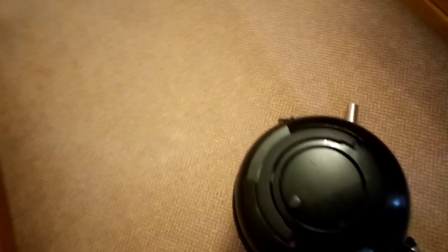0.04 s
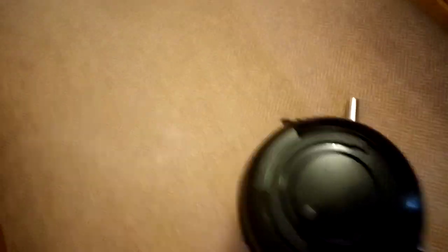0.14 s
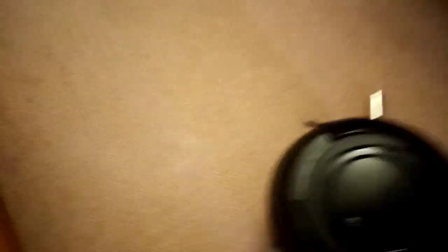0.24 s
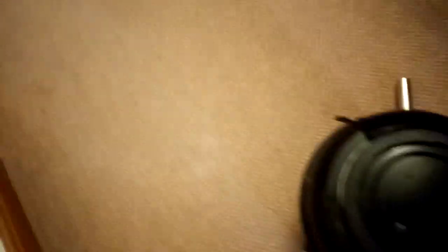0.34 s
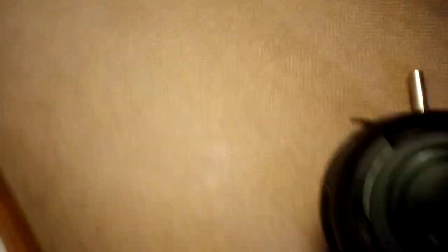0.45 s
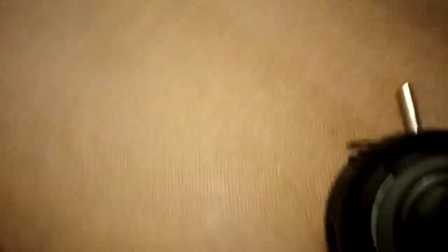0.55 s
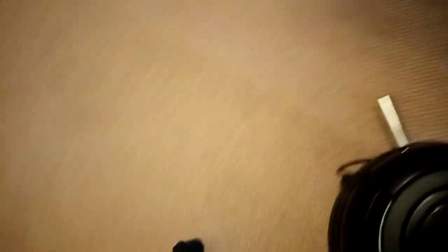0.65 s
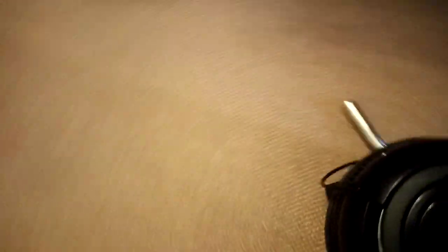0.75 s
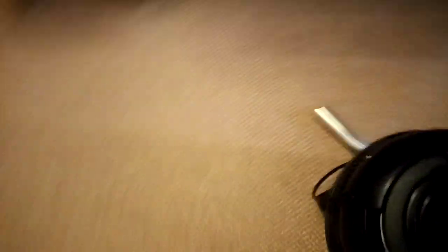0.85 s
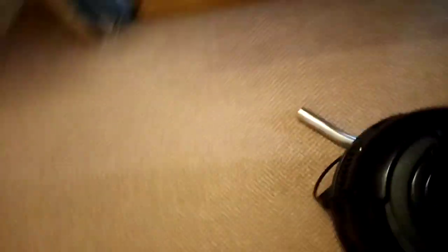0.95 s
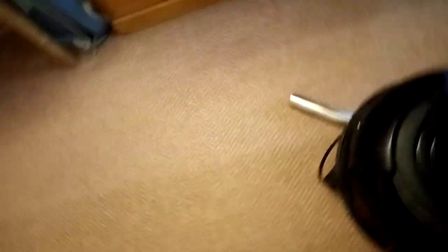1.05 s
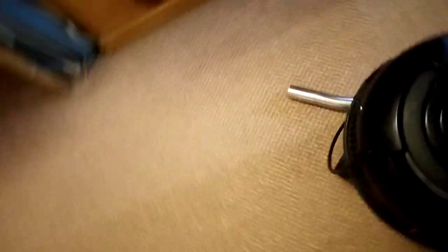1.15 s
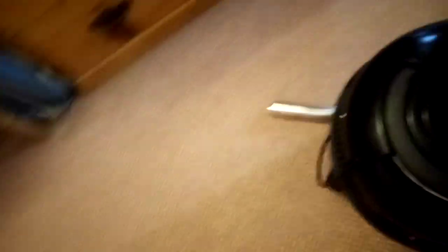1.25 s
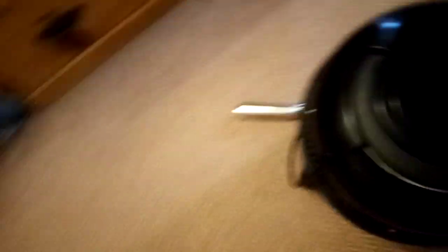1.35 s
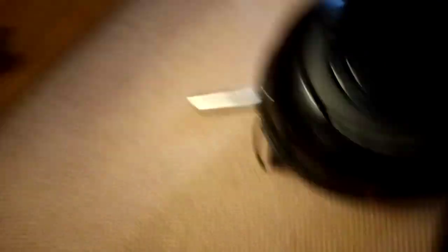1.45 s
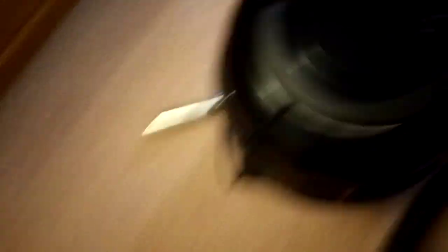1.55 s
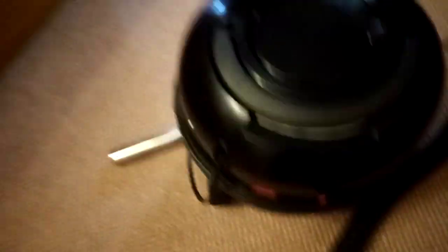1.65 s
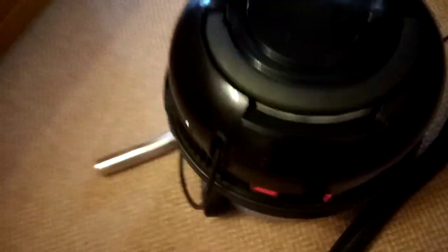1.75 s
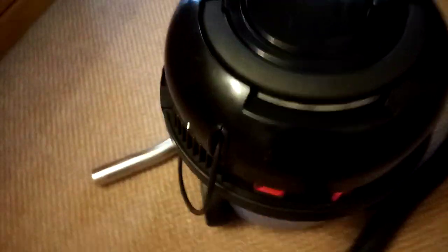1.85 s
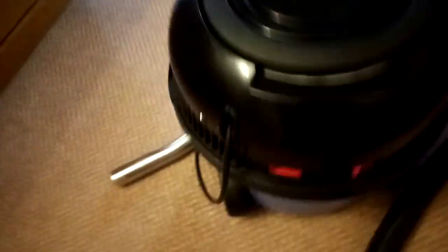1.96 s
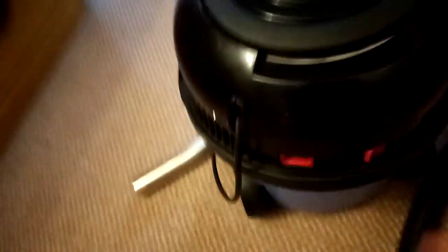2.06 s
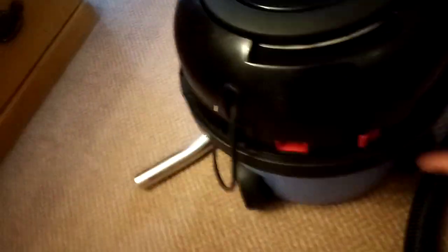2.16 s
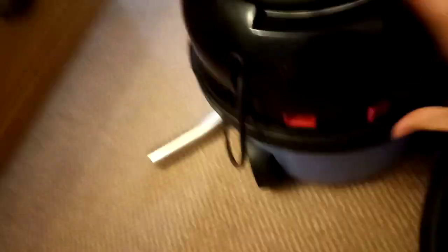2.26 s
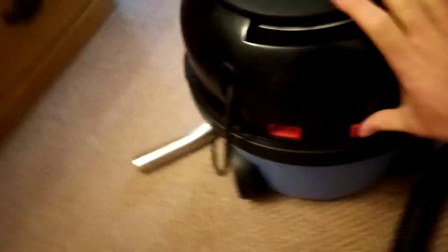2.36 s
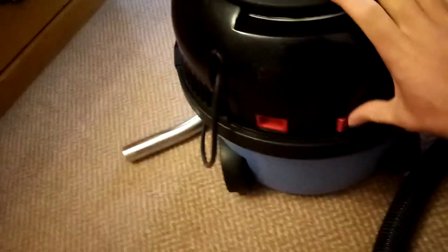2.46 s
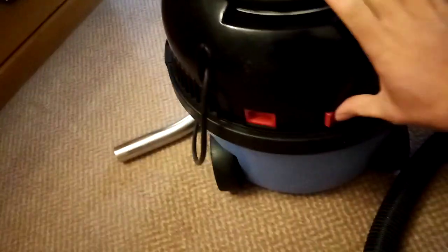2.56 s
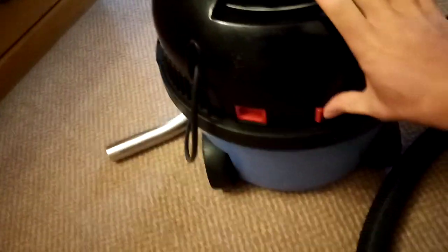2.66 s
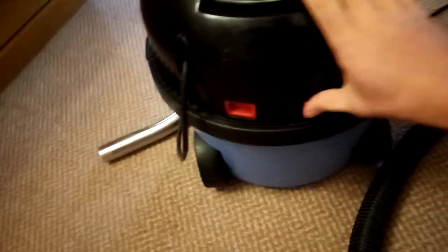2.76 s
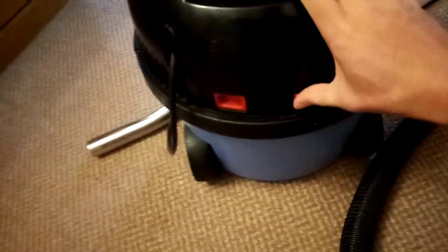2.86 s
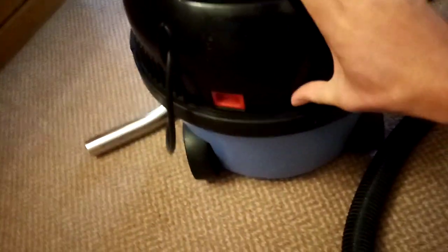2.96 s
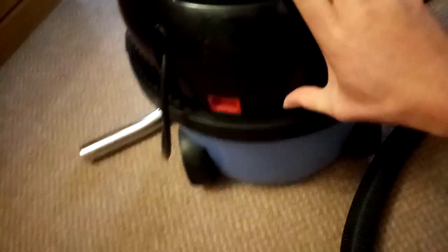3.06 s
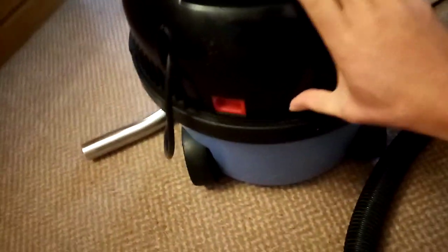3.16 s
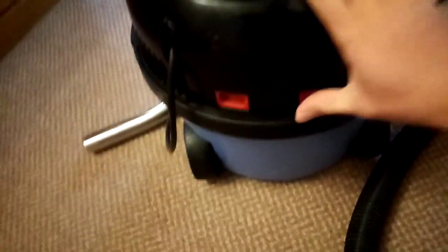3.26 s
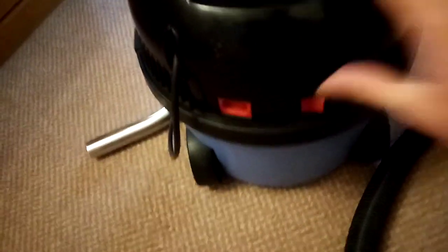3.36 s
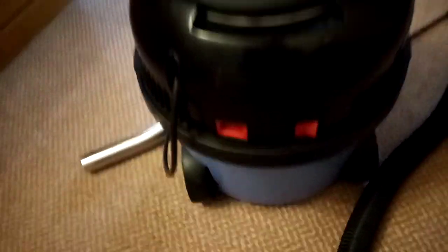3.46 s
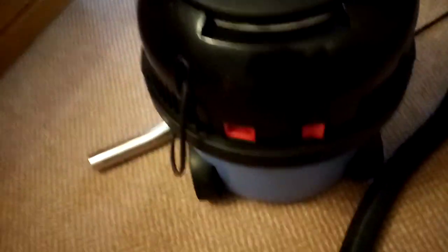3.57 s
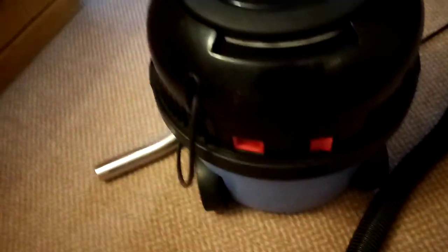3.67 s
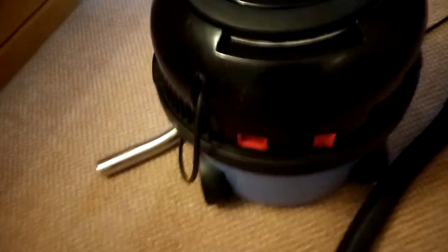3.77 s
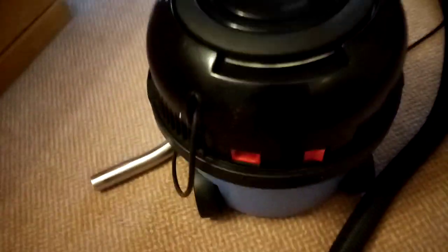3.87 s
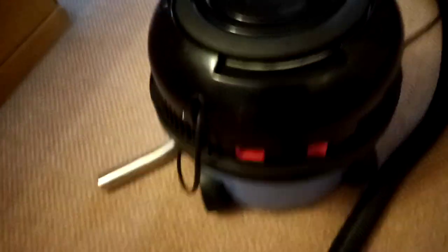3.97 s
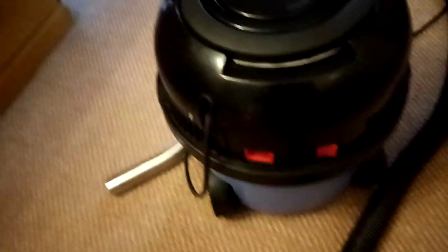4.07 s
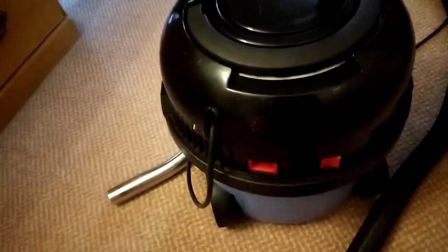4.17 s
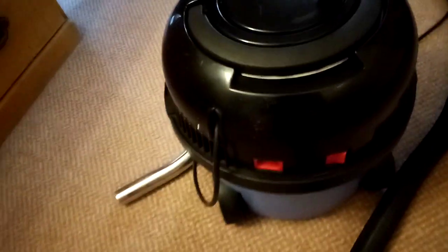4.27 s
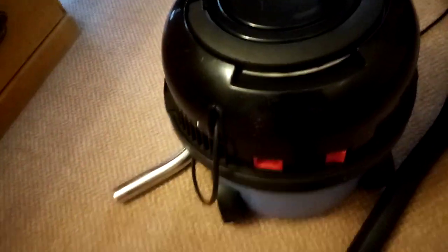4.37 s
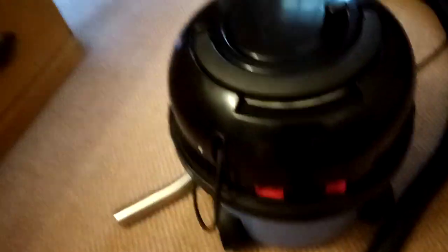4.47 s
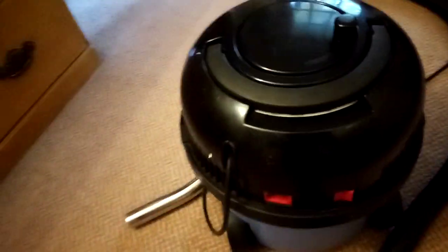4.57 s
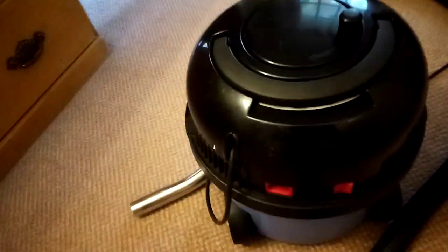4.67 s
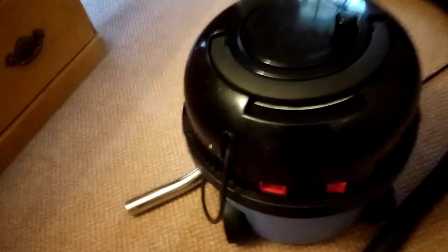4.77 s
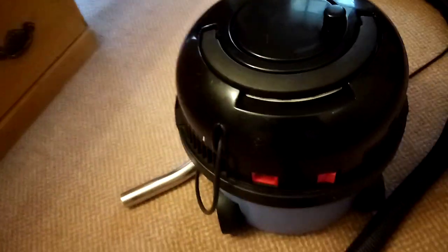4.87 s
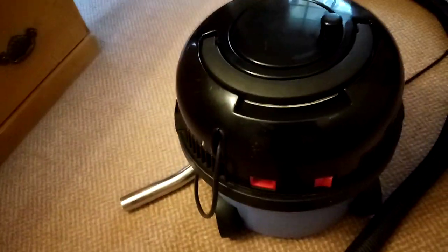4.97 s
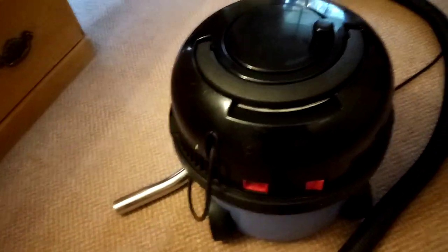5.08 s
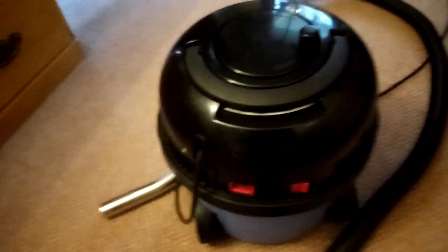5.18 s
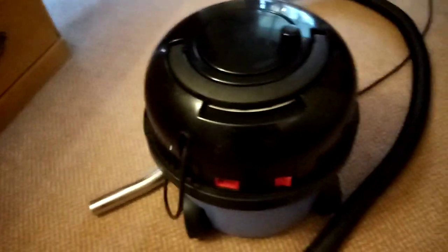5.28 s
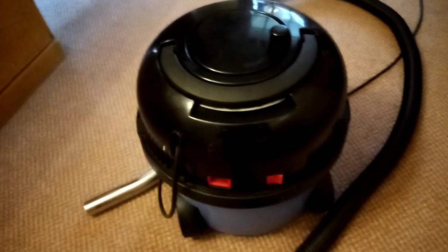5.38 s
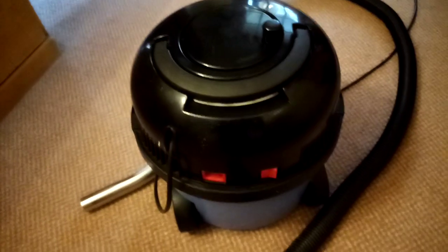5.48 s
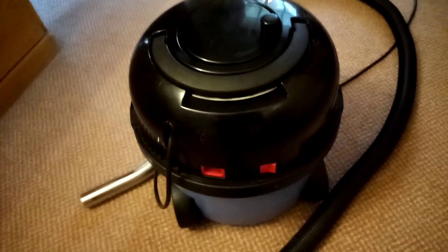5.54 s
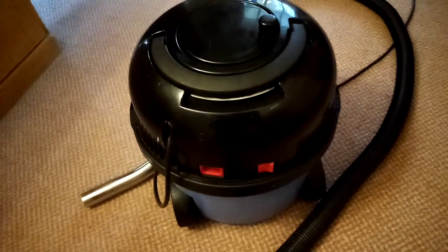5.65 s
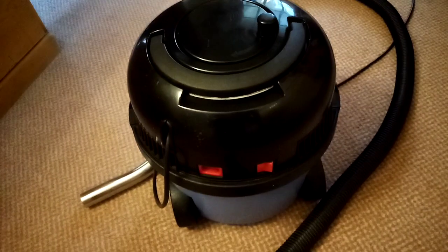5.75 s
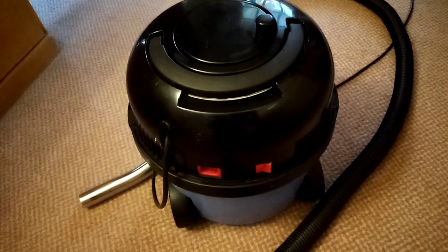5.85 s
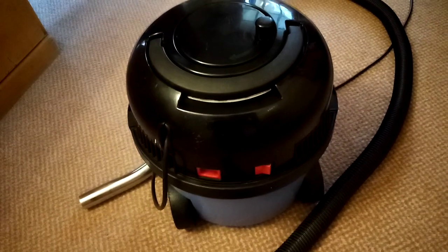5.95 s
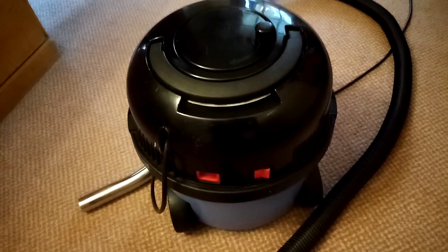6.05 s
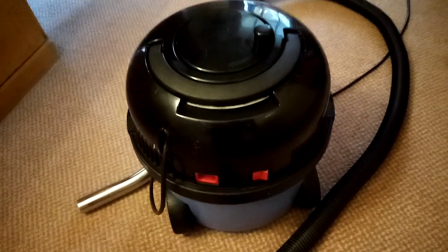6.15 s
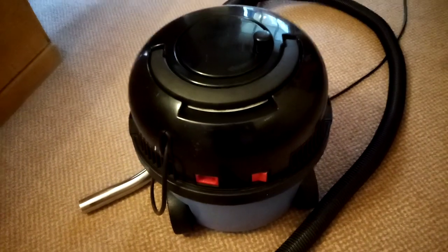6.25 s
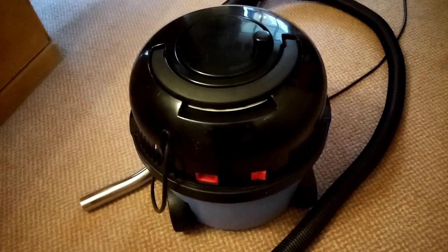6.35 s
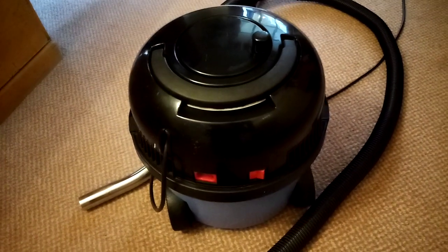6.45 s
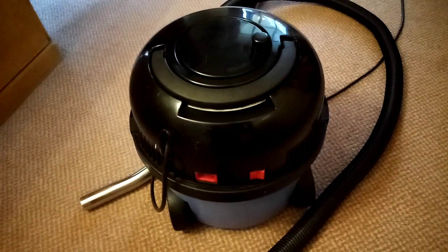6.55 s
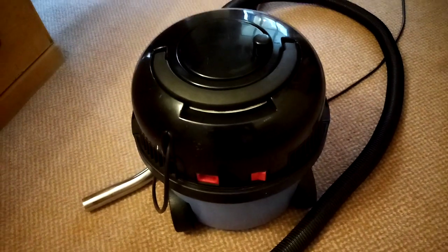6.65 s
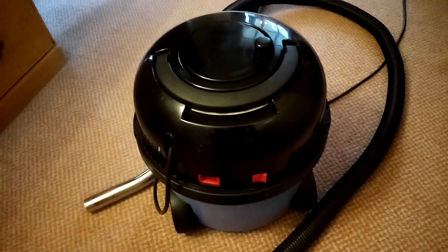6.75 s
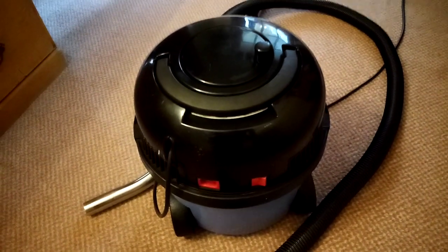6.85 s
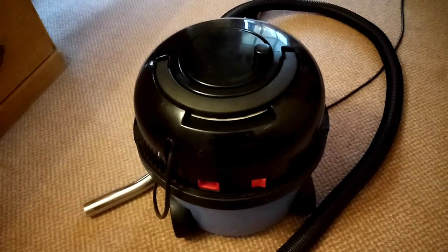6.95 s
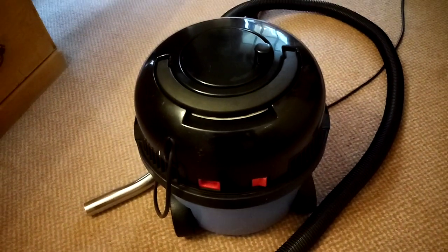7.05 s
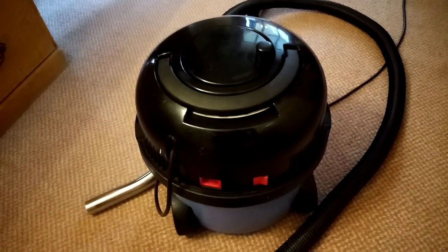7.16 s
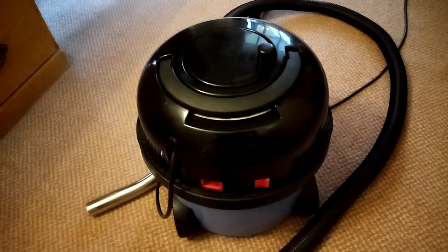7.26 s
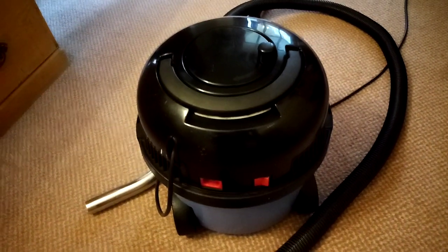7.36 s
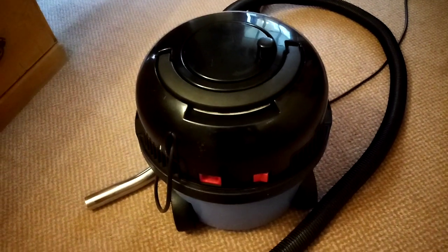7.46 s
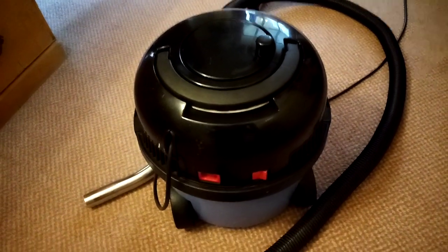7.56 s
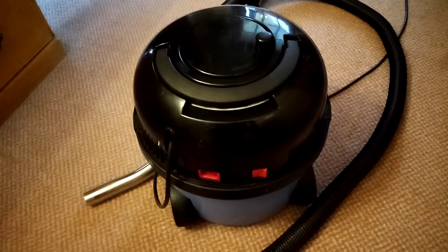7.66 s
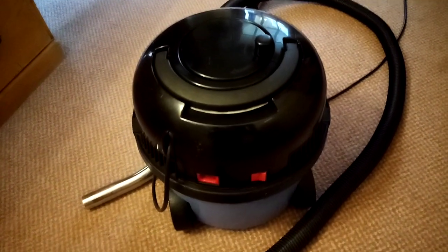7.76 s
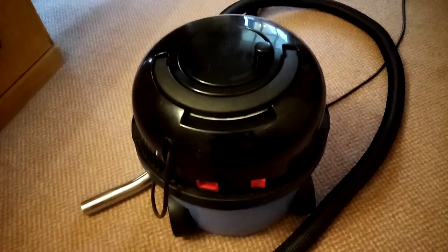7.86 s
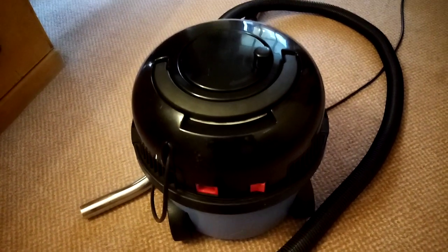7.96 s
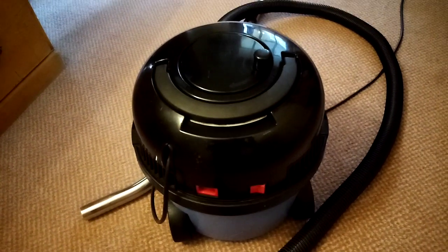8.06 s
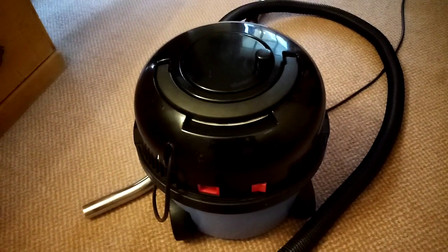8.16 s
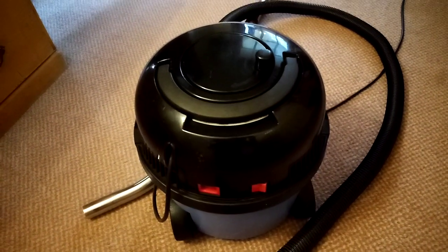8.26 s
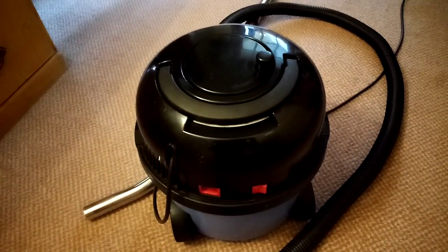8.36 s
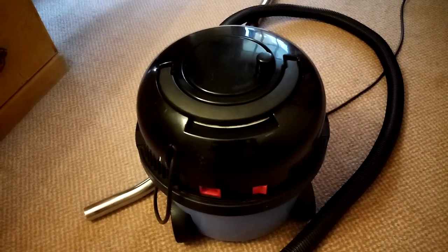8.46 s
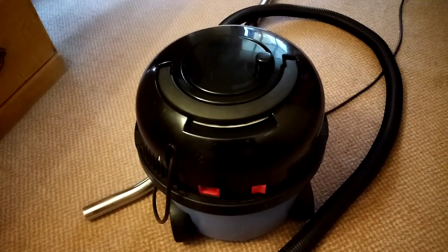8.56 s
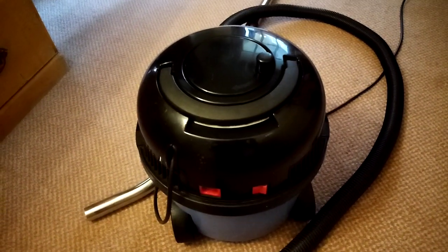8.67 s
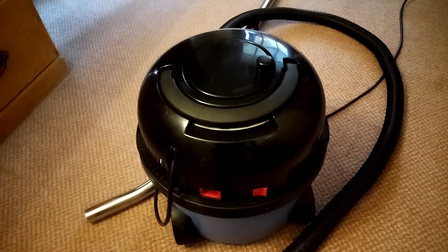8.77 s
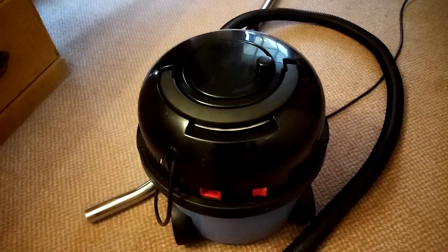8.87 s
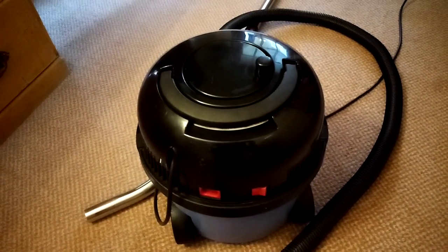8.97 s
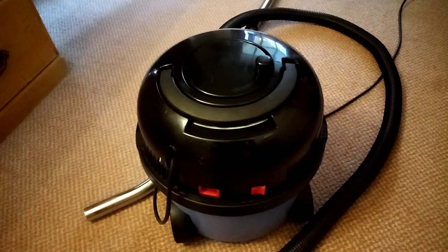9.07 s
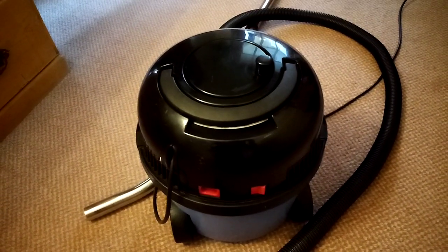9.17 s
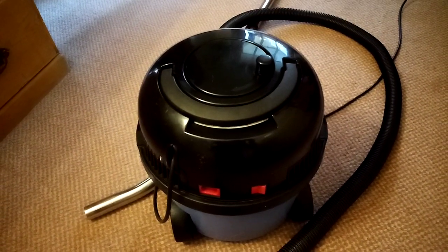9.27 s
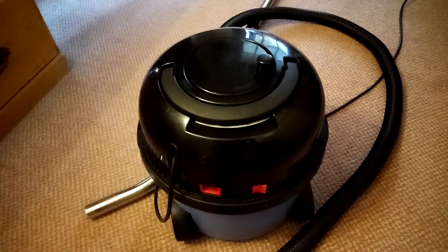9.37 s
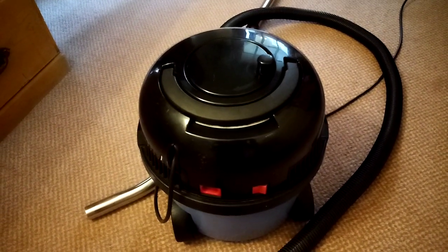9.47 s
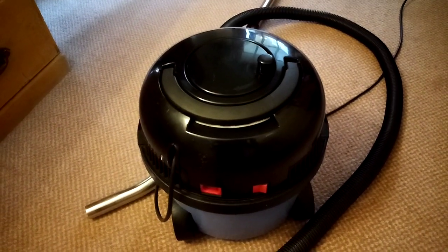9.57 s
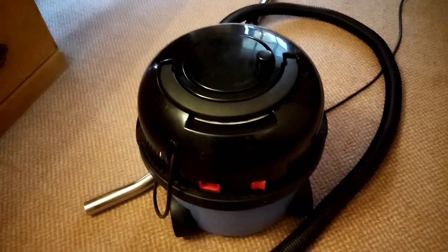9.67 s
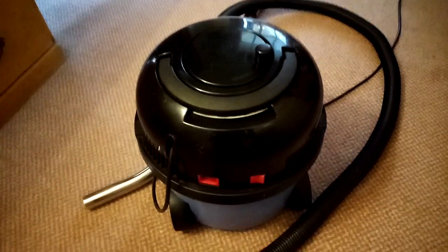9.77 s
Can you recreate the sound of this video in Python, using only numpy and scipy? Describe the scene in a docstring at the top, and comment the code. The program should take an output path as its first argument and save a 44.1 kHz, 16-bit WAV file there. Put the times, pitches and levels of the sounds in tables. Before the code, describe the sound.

Loud vacuum cleaner roar indoors, two airy whooshes, a sharp switch click, then the motor coasts down in a long falling whine to near silence.

```python
"""Vacuum cleaner switched off

A canister vacuum runs on a carpet; its nozzle comes free with two whooshes, the switch clicks, the motor coasts down.
Air roar is shaped noise ringing in the drum; shaft, blade and ball-bearing tones are sines locked to the turning
rotor, swelling and fading as they slide; the brushes rub noise once a turn; panels rattle, a narrow gap whistles.
Two spaced microphone ports sit in a moving hand; the left one is dull, the right one later."""
import sys
import numpy as np
from scipy import signal
from scipy.fft import rfft, irfft, next_fast_len
from scipy.io import wavfile
from scipy.ndimage import uniform_filter1d

SR = 44100
rng = np.random.default_rng(int(sys.argv[2]) if len(sys.argv) > 2 else 0)


def generate_wav(signal):
    """Clip the signal to [-1, 1] and save it as 16-bit WAV at the path in sys.argv[1]."""
    frames = np.transpose(np.atleast_2d(signal))
    scaled = np.clip(frames, -1, 1) * 32767
    pcm = np.round(scaled).astype(np.int16)
    wavfile.write(sys.argv[1], SR, pcm)


N = 433062
T = np.arange(N) / SR  # time of each sample [s]

# Rotor speed under load, which falls as the nozzle opens: (time [s], speed [turns/s])
SHAFT_SPEED = [(0, 359), (0.2, 359), (0.58, 347.5), (0.72, 351), (1.15, 336), (1.35, 331.5), (1.6, 328.2),
               (2, 327)]
COAST_S, OFF_S = 2.9565, 2.973  # the rotor starts to slow [s], the hum is gone [s]
FRICTION, VISCOUS = 7.89, .125  # slowing: constant [turns/s per s], share that follows speed [1/s]
FAN_DRAG, FAN_POWER = 13.22, 2.338  # slowing by the fan at 100 turns/s [turns/s per s], its power of speed

# Base air levels at full speed: (time [s], rumble [dB], roar [dB], hiss [dB], fizz [dB])
AIR_LEVELS = [(0, -44.5, -30.5, -30, -26), (.16, -53, -35.5, -25.5, -28.5), (.5, -51, -39.5, -28.5, -26.5),
              (1.0, -56.5, -30.5, -27.5, -26), (1.3, -45.5, -32, -29.5, -24),
              (1.61, -38.5, -25.5, -25.5, -28.5), (1.9, -38, -27.5, -23.5, -33.5),
              (2.2, -38.5, -28.5, -25.5, -27), (2.7, -42, -27.5, -26.5, -29.5),
              (3.2, -36, -24.5, -23.5, -26)]
# Borders between rumble, roar, hiss and fizz: (frequency [Hz])
LAYER_EDGES = [400, 2800, 10000]
# Share of the nozzle closed by the carpet: (time [s], share [0-1])
NOZZLE_SEAL = [(0, 0.64), (.9, 1), (1.4, 0.05), (9.82, 0)]
# Relative colour of air forced past the carpet: (frequency [Hz], density [dB per Hz])
SEALED_AIR = [(24, -67), (50, -28), (94, -36), (198, -14), (261, -17), (380, -18.5), (500, -18.5),
              (1980, -10), (2140, -10.5), (3270, -6), (4200, -2), (5260, -3), (6420, 2), (11400, -13.5),
              (15800, -4.5)]
# Relative colour of free flow: (frequency [Hz], density [dB per Hz])
FREE_AIR = [(24, -65), (52, -48), (91, -17), (319, -17.5), (488, -17), (766, -13.5), (846, -2),
            (1260, -3.5), (1500, -0.5), (1840, -4), (1980, -7), (3270, 1), (6750, 21.5), (10900, 6.5),
            (15800, 11.5)]
# Relative colour of brushes and bearings alone: (frequency [Hz], density [dB per Hz])
BRUSH_RUB = [(24, -80.5), (40, -35), (120, -16), (184, -15), (219, -4.5), (268, -19.5), (319, -17),
             (400, -23.5), (520, -16.5), (747, -12.5), (825, -10.5), (1200, -19), (1360, -17.5),
             (4520, -19), (6110, -13.5), (10900, -39), (15800, -35)]
# Drum resonances and hollows, scaled for each noise: (frequency [Hz], width [Hz], gain [dB])
DRUM_MODES = [(123, 72, -8.5), (208, 20, -3.5), (556, 340, 16.5), (785, 23, 9), (1023, 40, 14),
              (1391, 18, 20), (1602, 166, 15), (2176, 340, 9.5), (2626, 150, 7), (3240, 920, -3),
              (4220, 1200, 4), (6290, 250, 3), (6450, 120, 4.5), (8610, 1630, 11.5)]
# Likeness of the noise at the two ports: (frequency [Hz], likeness [0-1])
PORT_LIKENESS = [(40, 0.15), (100, 0.94), (400, 0.88), (1000, 0.057), (1300, 0.14), (1700, 0.36),
                 (2500, 0.11), (5000, 0.016), (10000, 0.031)]
# Fading, a row per layer: (air loss [dB per octave of speed], rub at full speed [dB], its loss [dB per octave])
SPEED_FADE = [(11.43, -55.5, 10.5), (16.5, -42.5, 4.5), (13.6, -35.5, 8), (23.5, -36, 7.5)]
# Swells and dips of the air noise: nozzle whooshes, later dips, a late rumble:
# (time [s], rise [s], fall [s], rumble [dB], roar [dB], hiss [dB], fizz [dB])
AIR_SWELLS = [(.06, 0.051, 0.035, 8, -0.5, 5.5, -0.5), (.11, 0.043, 0.012, -2, -2.5, 1, 9.5),
              (.33, 0.15, 0.061, 2, -0.5, 4, 4), (0.524, 0.038, 0.054, -10, 6.5, 12.5, -2),
              (.62, 0.093, 0.025, 5.5, -5, -2, 1), (.74, 0.089, 0.32, 13.5, 5.5, 8, 5.5),
              (.792, 0.014, 0.02, 11, 5, -1, -3), (.97, 0.086, 0.077, -0.5, -3.5, -6, -2.5),
              (1.2, 0.053, 0.046, 2, 1.5, 4, -1), (2.98, 0.038, 0.033, -5.5, -2, -3.5, -6),
              (3.92, 0.37, .25, -3.5, 1, 1.8, -4), (9.7, 0.18, .3, 14, 1, 1.5, 3)]
# Narrow peaks and hollows that come out as the rotor slows: (frequency [Hz], width [Hz], gain [dB])
SLOW_MODES = [(400, 120, 0.5), (690, 170, -10), (1000, 150, -3.5), (1200, 150, 1.5), (1630, 200, 0.5),
              (1750, 120, -2.5), (2900, 110, 9.5), (3220, 430, -9), (3660, 150, 3), (3960, 120, -13),
              (4200, 150, 4), (4500, 220, -10), (4770, 200, 2), (5560, 180, 5.5), (5720, 150, -1.5),
              (5980, 330, 8), (6440, 250, -0.5), (6700, 300, 3.5), (7800, 590, -5.5), (9050, 300, 5),
              (9400, 250, -5), (9700, 250, 6.5)]
SLOW_MODES_HALF = 55  # half out at this speed [turns/s]

# Shaft, twice the shaft, ball pass, six blades, twice the ball spin:
# (multiple of the shaft, extra lead at the left port [rad], left over right [dB])
SHAFT_ORDERS = [(1, 0, 0), (2, -.5, 1), (2.6, .8, -5), (6, 1.4, -2), (7.08, -.2, 4)]
# How each of those sounds as it slides, a list per multiple: (frequency [Hz], peak level [dB])
ORDER_SHAPES = [
    [(100, -90), (116, -60), (135, -52), (160, -45), (215, -44), (280, -42), (327, -46), (340, -39)],
    [(95, -92), (120, -70), (135, -61), (170, -67), (200, -61), (260, -62), (320, -57), (360, -62),
     (420, -58), (455, -47), (550, -38), (650, -37)],
    [(112, -92), (122, -64), (140, -64), (160, -80), (400, -78), (420, -60), (470, -54), (550, -43),
     (620, -48), (690, -53), (740, -44), (790, -50), (850, -39)],
    [(700, -85), (740, -62), (830, -47), (930, -50), (1000, -39), (1090, -35), (1150, -39), (1230, -46),
     (1400, -45), (1500, -37), (1600, -29), (1710, -29), (1830, -38), (1960, -33)],
    [(150, -81), (196, -71), (223, -57), (252, -82), (295, -72), (322, -62), (352, -84), (372, -62),
     (440, -54), (485, -68), (535, -53), (590, -65), (650, -61), (690, -62), (770, -85)],
]
# Low and blade tones swell, fade and shift between the ports:
# (time [s], low tones [dB], blade tone [dB], further blade lead at the left port [rad])
TONE_REACH = [(0, -11, 5, 2.6), (.13, -14, 2, 3.4), (.27, -20, 0, 4.4), (.36, -21, -12, 4.2),
              (1, -19, -18, 6), (1.2, -10, -6, 6), (1.35, -7, -8, 6.1), (1.47, -4, 2, 7.3),
              (1.65, -1, 5, 8), (1.9, 0, 5.5, 9.4), (2.05, 0, 3, 9.2), (2.22, 0, 6.5, 8.2),
              (2.9, 0, 5, 8.6), (3.05, 0, 0, 11.1), (3.25, 0, 0, 12.2), (3.45, 0, 0, 9.5), (3.75, 0, 0, 11),
              (4.05, 0, 0, 15.9), (4.55, 0, 0, 17.8)]
# Further lead of the twice-shaft tone at the left port: (time [s], lead [rad])
TWICE_SHAFT_LEAD = [(2, .2), (2.9, .7), (3.05, 1.2), (3.2, .2), (3.5, -.7), (3.75, .3)]

# Overtones of ball pass and ball spin, before trim and cradle:
# (multiple of the shaft, peak level at 60 turns/s [dB])
BEARING_OVERTONES = [(5.2, -73), (7.4, -73), (7.8, -71), (8.2, -72), (10.4, -70), (10.6, -76), (10.95, -71),
                     (13, -64), (14.12, -75), (14.5, -69), (15.6, -65), (18.2, -65), (20.8, -73),
                     (23.4, -66), (26, -72), (28.55, -69), (33.2, -72), (36.4, -76), (39, -75)]
# Resonances and hollows that the bearing tones cross: (frequency [Hz], width [Hz], gain [dB])
CRADLE_MODES = [(235, 50, 13), (440, 120, -8), (560, 80, 11), (650, 80, 11), (745, 40, -11), (803, 70, 15),
                (900, 150, 11), (1050, 120, 7), (1200, 150, -10), (1375, 50, 13), (1640, 80, 7)]
# Bearing tones at the left port against the right: (frequency [Hz], gain [dB])
CRADLE_TILT = [(480, 5), (560, -4), (700, -4), (765, 11), (825, 5), (900, -3), (1300, -3), (1500, 3)]
# Thin, rough whistles: (multiple of the shaft at 96 turns/s, power of speed by which it sinks,
# loudest at [Hz], 20 dB down this far away [Hz], level [dB])
ROTOR_WHISTLES = [(86, .145, 7900, 2800, -52), (56.2, 0, 4500, 1100, -57), (86, .145, 4820, 350, -59)]

# Rattling panels: (frequency [Hz], width [Hz], roughest at [turns/s],
# 20 dB down this far away [octaves], level [dB])
PANEL_MODES = [(814, 75, 135, 0.64, -45.5), (538, 67, 72.7, 0.6, -43.5), (632, 33, 87.7, -0.24, -47)]
RATTLE_PER_TURN, RATTLE_DB = .22, 5  # pulses a turn, swing either way [dB]
# Whistle of the narrow nozzle gap: (time [s], rise [s], fall [s], level [dB])
GAP_WHISTLES = [(.1, .2, 0.31, -29.5), (.42, 0.1, 0.079, -23.5), (.67, 0.041, 0.033, -21)]
# The switch, then small ticks: (time [s], peak level [dB], centre [Hz], width [octaves], 60 dB decay [s])
SWITCH_CLICKS = [(2.973, -17, 4500, 1.2, .004), (9.624, -45, 12000, .6, .002),
                 (9.7095, -44, 11000, .9, .002), (9.718, -45, 12000, .7, .004),
                 (9.790, -46, 4000, 1.5, .003)]
# Soft bumps, before make-up gain: (time [s], level [dB], frequency [Hz], 60 dB decay [s])
SOFT_BUMPS = [(0.784, -41, 190, 0.045), (4.716, -39, 131, 0.066)]
# Relative colour of the quiet room and microphone hiss: (frequency [Hz], density [dB per Hz])
ROOM_COLOUR = [(30, -47), (70, -16), (120, -3), (220, -2), (500, -15), (2000, -35), (6000, -16),
               (15800, -32)]

# The hand turns the ports, before a fixed offset: (time [s], left over right [dB])
HAND_TURN = [(0, 2), (.35, -1), (.66, -2.5), (.79, -8.5), (.86, 0), (1.3, -0.5), (1.8, 2), (3.2, 0.6),
             (6.8, 0), (9.82, -1)]
# Dullness of the left port against the right, before a fixed offset: (frequency [Hz], gain [dB])
LEFT_COLOUR = [(60, -3.5), (300, 0.5), (1000, -3), (2700, 0.5), (6400, -4), (9500, -5.5), (10400, -13.5),
               (15000, -25.5)]
# Lead of the left port, which hears first: (frequency [Hz], phase [rad])
LEFT_LEAD = [(0, 0), (860, 5), (1380, 8.6), (1810, 10.5), (2150, 12.4), (22050, 119)]
# Microphone colour: (frequency [Hz], width [Hz], gain [dB])
MIC_MODES = [(13200, 2000, -1.5), (15050, 650, 9)]
TOP_HZ = 15650  # band limit [Hz]


def shaft():
    """Turns per second: set by the load, then braked by friction and the fan."""
    speeds = np.arange(SHAFT_SPEED[-1][1], 5, -.05)
    slowing = FRICTION + VISCOUS * speeds + FAN_DRAG * (speeds / 100) ** FAN_POWER
    since_off = np.cumsum(.05 / slowing)  # time taken to reach each speed
    coasting = np.interp(T, COAST_S + since_off, speeds)
    return np.where(T < COAST_S, curves(SHAFT_SPEED)[0], coasting)


def airflow(speed, turns):
    """Air noise gives way to the rub of brushes and bearings as the fan slows."""
    seal, = np.clip(curves(NOZZLE_SEAL), 0, 1)
    air = 1 / (1 + (150 / speed) ** 4)  # share of power that is air
    # One high spot on the commutator swells the rub once a turn below 70 turns/s
    slowness = np.clip(1 - speed / 70, 0, 1)
    rub = np.exp(0.6 * slowness * np.cos(2 * np.pi * turns))
    rub /= np.sqrt(np.abs(uniform_filter1d(rub ** 2, size=8192)))
    sealed = layers(SEALED_AIR, 0.26, patchy_db=2.5)
    free = layers(FREE_AIR, 0.31, patchy_db=1.57)
    idle = layers(BRUSH_RUB, 0.65, patchy_db=1.5)
    rub_depths = [0.63, 0.0, 0.62, 0.79]  # rumble, roar, hiss, fizz
    flutter = amp(0.5 * wobble(14))
    out = 0
    for shut, loose, brushed, gain, depth in zip(sealed, free, idle, levels(speed), rub_depths):
        blowing = np.sqrt(air * seal) * shut + np.sqrt(air * (1 - seal)) * loose
        rubbing = np.sqrt(1 - air) * rub ** depth * brushed
        out = out + gain * flutter * (blowing + rubbing)
    bare = 1 / (1 + (speed / SLOW_MODES_HALF) ** 6)
    coloured = filtered(out, lambda hz: amp(peaks_db(SLOW_MODES, hz)))
    return (1 - bare) * out + bare * coloured


def layers(spectrum, ringing, patchy_db):
    """Patchy noise at both ports, split into four layers of rms 1; ringing scales the drum's peaks."""
    grid = signal.stft(rng.standard_normal((2, N)), nperseg=512, noverlap=256)[2]
    patches = uniform_filter1d(rng.standard_normal(grid.shape[1:]), size=8, axis=0)
    patches = unit(uniform_filter1d(patches, size=6, axis=1))
    pair = signal.istft(grid * amp(patchy_db * patches), nperseg=512, noverlap=256)[1][:, :N]
    m = next_fast_len(N)
    hz = np.fft.rfftfreq(m, 1 / SR)
    # The mid/side balance sets how alike the ports are
    angle = np.arccos(np.clip(along(PORT_LIKENESS, hz), 0, 1)) / 2
    colour = amp(along(spectrum, hz) + ringing * peaks_db(DRUM_MODES, hz))
    mid, side = rfft(pair, m) * colour * [np.cos(angle), np.sin(angle)]
    ports = np.array([mid + side, mid - side])
    below = [0] + [1 / (1 + (hz / edge) ** 12) for edge in LAYER_EDGES] + [1]
    return [unit(irfft(np.sqrt(hi - lo) * ports, m)[:, :N]) for lo, hi in zip(below, below[1:])]


def levels(speed):
    """Gain of each layer: air that dies fast with speed, rub that dies slowly, and the swells."""
    octaves = np.minimum(np.log2(speed / SHAFT_SPEED[-1][1]), 0)
    swells = sum(np.outer(row[3:], hump(*row[:3])) for row in AIR_SWELLS)
    gains = []
    for db, (air_loss, rub_db, rub_loss), swell in zip(curves(AIR_LEVELS), SPEED_FADE, swells):
        air = amp(db + air_loss * octaves)
        rub = amp(rub_db + rub_loss * octaves) * (T > 1)
        gains.append(amp(swell) * np.hypot(air, rub))
    return gains


def shaft_tones(speed, turns):
    """Shaft, blade and ball tones swell, fade and shift between the ports as their pitch slides."""
    left = np.array([[1], [0]])
    low_db, blade_db, blade_lead = curves(TONE_REACH)
    out = 0
    for (k, lead, tilt), shape in zip(SHAFT_ORDERS, ORDER_SHAPES):
        db = along(shape, k * speed) + (blade_db if k == 6 else low_db) + tilt * (left - .5)
        if k == 6:
            lead = lead + blade_lead
        if k == 2:
            lead = lead + curves(TWICE_SHAFT_LEAD)[0]
        out = out + line(turns, k, db, left * lead)
    return out


def bearing_tones(speed, turns):
    """Bearing overtones lose level with speed and swell as they cross the cradle's resonances."""
    left = np.array([[1], [0]])
    speed_db = 14 * np.log10(speed / 60)
    hz = np.arange(1., SR // 2)
    cradle_db = peaks_db(CRADLE_MODES, hz) - 40 * np.log10(1 + 170 / hz)  # weak in the bass
    left_db = along(CRADLE_TILT, hz)
    out = 0
    for k, db in BEARING_OVERTONES:
        body_db = np.interp(k * speed, hz, cradle_db) + left * np.interp(k * speed, hz, left_db)
        out = out + line(turns, k, db + speed_db + body_db, .5 * left)
    return amp(-5.5) * out


def rotor_whistles(speed, turns):
    """Thin tones follow the rotor, roughened by quick random phase, each loudest near one pitch."""
    out = np.zeros(N)
    for k, sink, centre, away, db in ROTOR_WHISTLES:
        pitch = speed * (speed / 96) ** sink
        drift = 2 * np.pi * (np.cumsum(pitch) / SR - turns)  # phase gained on the shaft
        level_db = db - 20 * ((k * pitch - centre) / away) ** 4 + 1.5 * wobble(30)
        out += line(turns, k, level_db, k * drift + 1.5 * wobble(260))
    return out


def gap_whistle():
    """Air through the narrow gap under the nozzle sings in one thin band."""
    swells = sum(amp(db) * hump(s, rise, fall) for s, rise, fall, db in GAP_WHISTLES)
    noise = rng.standard_normal((2, N))
    return swells * unit(filtered(noise, lambda hz: resonance(hz, 6500, 300)))


def rattle(speed, turns):
    """Uneven, pulsing knocks keep the panels ringing while the rotor passes its rough speeds."""
    out = np.zeros(N)
    for centre, width, rough, octaves, db in PANEL_MODES:
        uneven_db = 2 * wobble(60)
        pulse_db = RATTLE_DB * np.cos(2 * np.pi * RATTLE_PER_TURN * turns + wobble(6))
        shake = amp(uneven_db + pulse_db) * rng.standard_normal(N)
        ringing = unit(filtered(shake, lambda hz: resonance(hz, centre, width)))
        level_db = db - 20 * (np.log2(speed / rough) / octaves) ** 4 + .8 * wobble(24)
        out += amp(level_db) * ringing
    return out


def knocks():
    """Clicks are short bursts of noise; bumps are one damped swing."""
    out, t = np.zeros(N + SR), T[:SR // 8]
    for s, db, centre, octaves, t60 in SWITCH_CLICKS:
        burst = np.pad(amp(-60 * t / t60) * rng.standard_normal(len(t)), (64, 0))
        hz = np.fft.rfftfreq(len(burst), 1 / SR)
        band = np.exp(-.5 * (np.log2(hz / centre + 1e-9) / octaves) ** 2)
        burst = irfft(rfft(burst) * band, len(burst))
        out[round(s * SR) - 64:][:len(burst)] += amp(db) * burst / np.abs(burst).max()
    for s, db, hz, t60 in SOFT_BUMPS:
        contact = (1 - np.exp(-t * hz)) ** 2  # soft onset
        decay = amp(db + 11.5 - 60 * t / t60)
        out[round(s * SR):][:len(t)] += decay * contact * np.sin(2 * np.pi * hz * t)
    return out[:N]


def mains_hum():
    """A hum at twice the mains frequency, weaker with the nozzle sealed, ends with the switch."""
    hum_db = -50 - 6 * curves(NOZZLE_SEAL)[0] + 2.5 * wobble(9)
    powered = np.clip((OFF_S - T) / .01, 0, 1)
    return amp(hum_db) * np.sin(2 * np.pi * 100 * T) * powered


def room():
    """A steady floor of shaped noise, different at each port."""
    noise = rng.standard_normal((2, N))
    return amp(-72) * unit(filtered(noise, lambda hz: amp(along(ROOM_COLOUR, hz))))


def line(turns, k, db, lead):
    """A sine at k times the shaft, its level gently wavering, from a random phase."""
    return amp(db + 1.8 * wobble(10)) * np.sin(2 * np.pi * (k * turns + rng.random()) + lead)


def resonance(hz, centre, width):
    """Response of two equal resonators in a row."""
    return (1j * hz * width / (centre ** 2 - hz ** 2 + 1j * hz * width)) ** 2


def peaks_db(modes, hz):
    """Gain in dB of a set of resonances and hollows."""
    return sum(db / (1 + (2 * (hz - centre) / width) ** 2) for centre, width, db in modes)


def filtered(x, response):
    """x times a response of frequency."""
    m = next_fast_len(N + 8192)
    return irfft(rfft(x, m) * response(np.fft.rfftfreq(m, 1 / SR)), m)[..., :N]


def hump(s, rise, fall):
    """A smooth 0-1-0 shape with its top at s."""
    return np.exp(-((T - s) / np.where(T < s, rise, fall)) ** 2)


def wobble(rate):
    """A slow random curve, rate knots a second."""
    count = int(N * rate / SR) + 2
    return np.interp(T * rate, np.arange(count), rng.standard_normal(count))


def curves(rows):
    """One value per sample for each column after the time."""
    s, *columns = np.transpose(rows)
    return [np.interp(T, s, column) for column in columns]


def along(points, hz):
    """Value at each frequency, drawn through the points on a log axis."""
    f, v = np.transpose(points)
    return np.interp(np.log(hz + 1), np.log(f + 1), v)


def amp(db):
    """Decibels to amplitude."""
    return 10 ** (np.asarray(db) / 20)


def unit(x):
    """Scale to rms 1."""
    return x / np.sqrt(np.mean(x ** 2) + 1e-20)


def scene():
    """One rotor drives the air, tones and rattle; knocks, hum and room join them."""
    speed = shaft()
    turns = np.cumsum(speed) / SR
    turns -= turns[round(9.595 * SR)]  # a high spot passes the brush here
    rotor = shaft_tones(speed, turns) + bearing_tones(speed, turns) + rotor_whistles(speed, turns)
    machine = airflow(speed, turns) + rotor + gap_whistle() + rattle(speed, turns)
    return machine + knocks() + mains_hum() + room()


def record(dry):
    """The hand turns the ports; the left is dull, the right late; nothing passes above the band limit."""
    pan_db = curves(HAND_TURN)[0] + 2.5

    def ports(hz):
        left = amp(along(LEFT_COLOUR, hz) - 3)
        right = amp(1.5) * np.exp(-1j * np.interp(hz, *np.transpose(LEFT_LEAD)))
        return np.array([left, right]) * amp(peaks_db(MIC_MODES, hz)) * (hz < TOP_HZ)

    return filtered(dry * amp([pan_db / 2, -pan_db / 2]), ports)


dry = scene()
out = record(dry)
generate_wav(out)
```